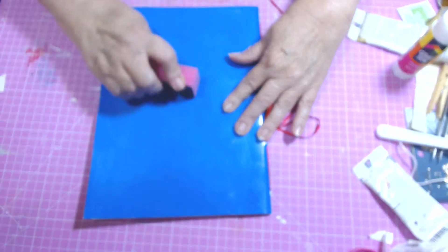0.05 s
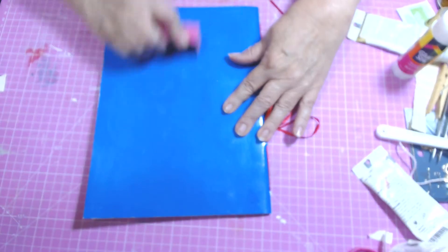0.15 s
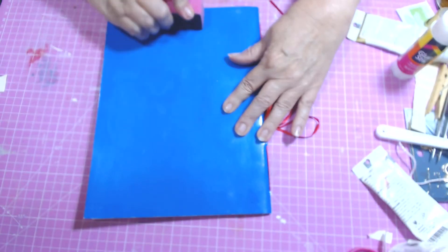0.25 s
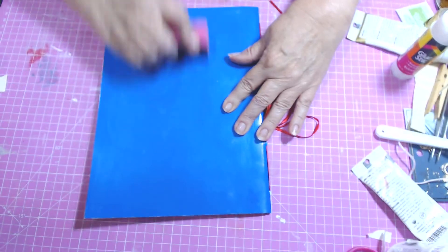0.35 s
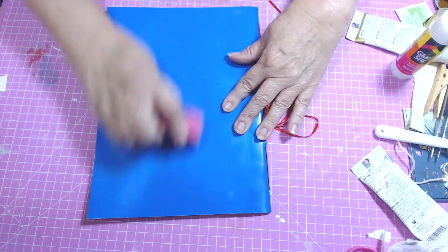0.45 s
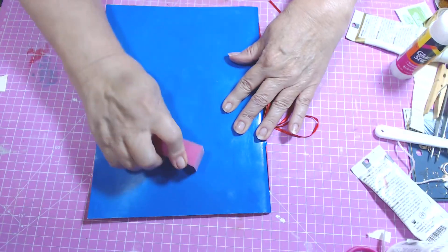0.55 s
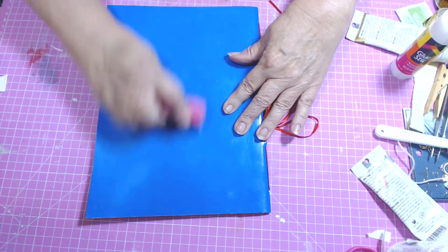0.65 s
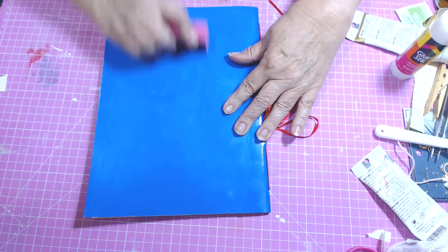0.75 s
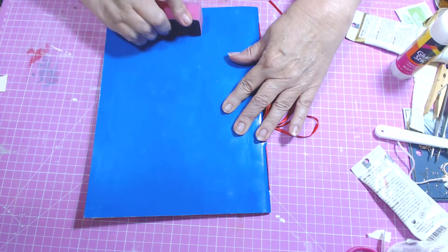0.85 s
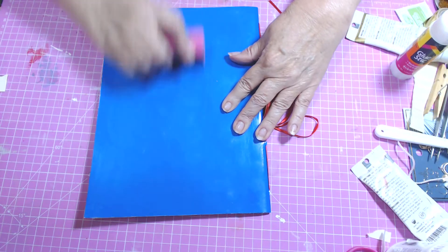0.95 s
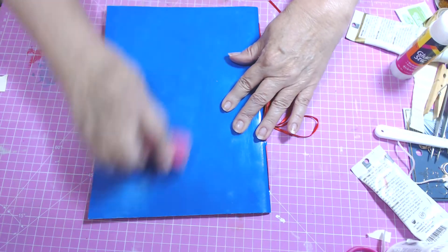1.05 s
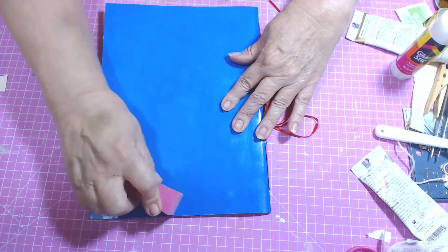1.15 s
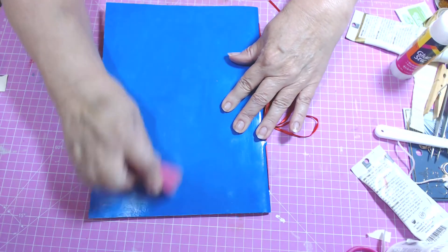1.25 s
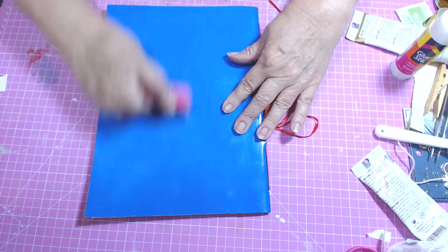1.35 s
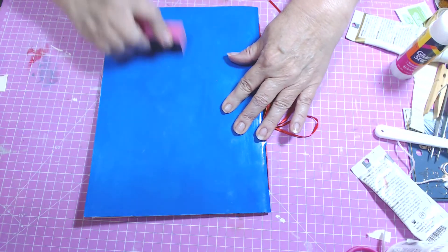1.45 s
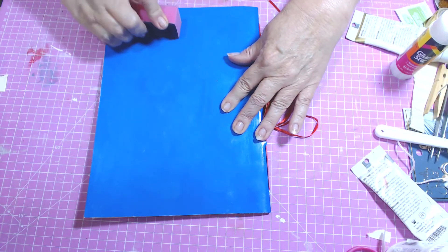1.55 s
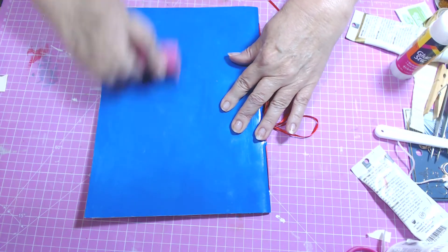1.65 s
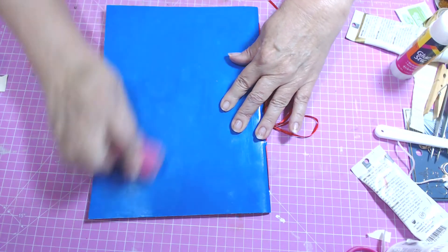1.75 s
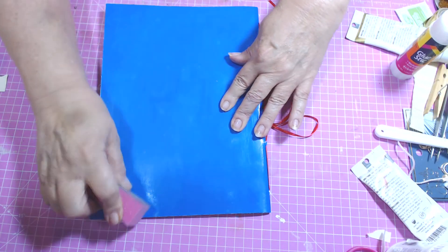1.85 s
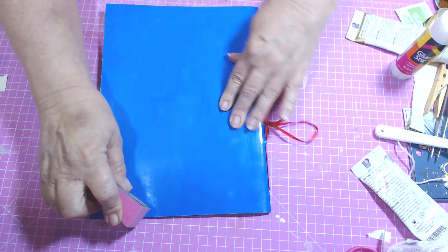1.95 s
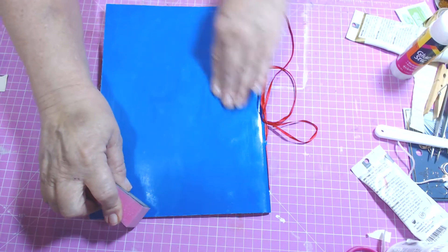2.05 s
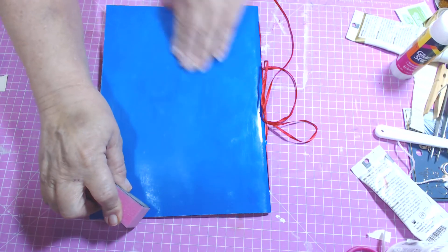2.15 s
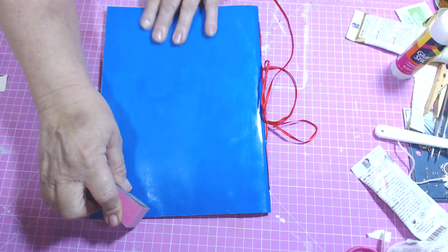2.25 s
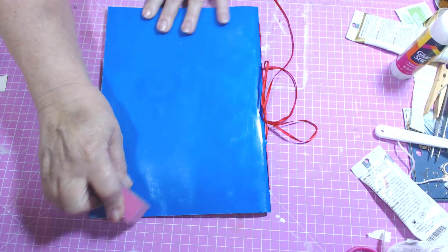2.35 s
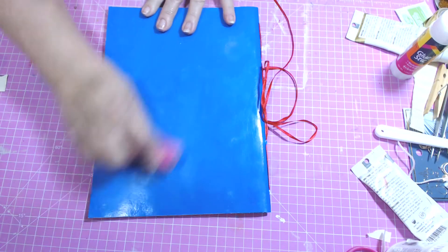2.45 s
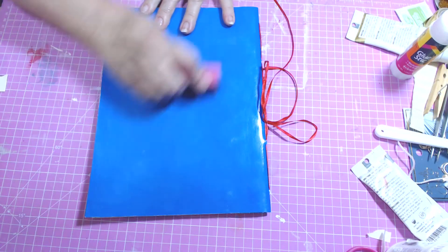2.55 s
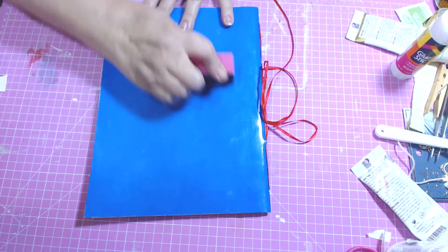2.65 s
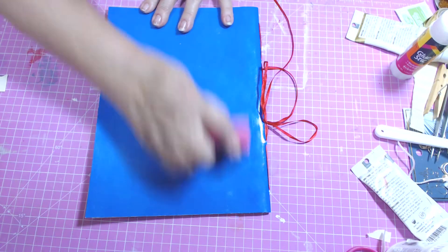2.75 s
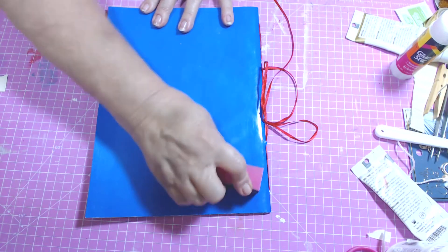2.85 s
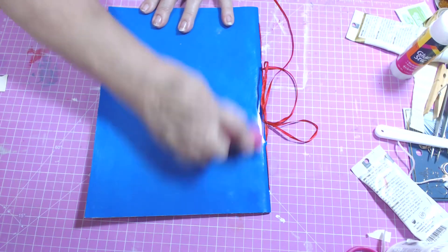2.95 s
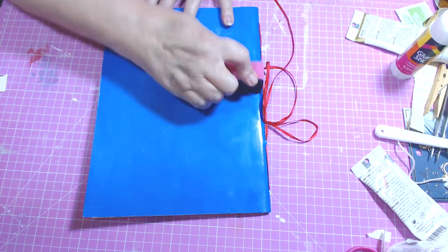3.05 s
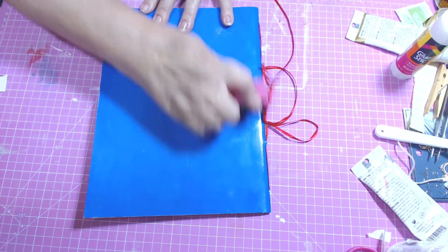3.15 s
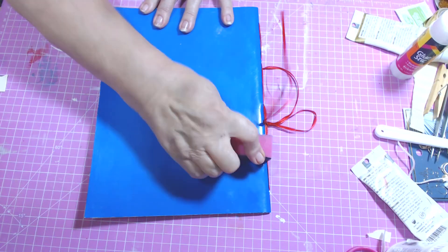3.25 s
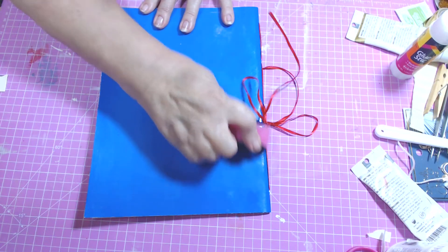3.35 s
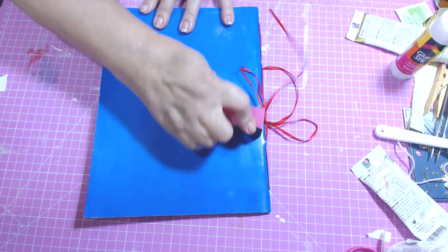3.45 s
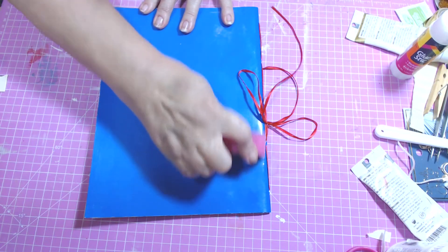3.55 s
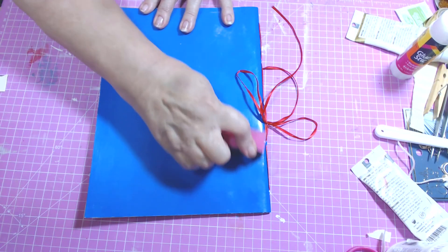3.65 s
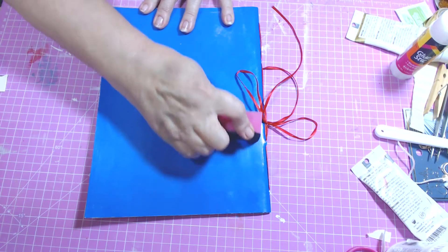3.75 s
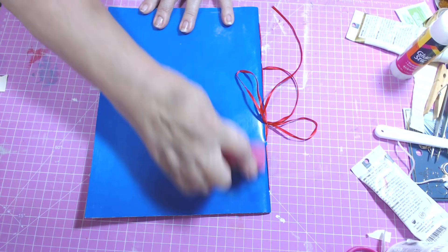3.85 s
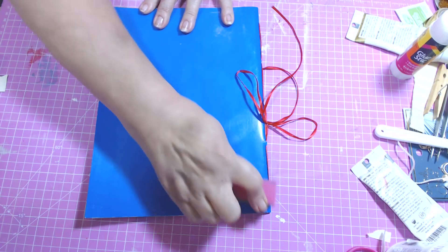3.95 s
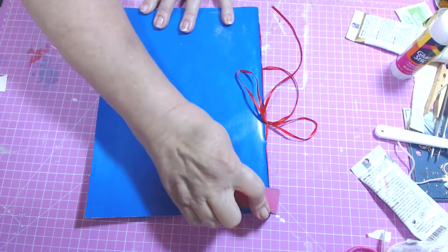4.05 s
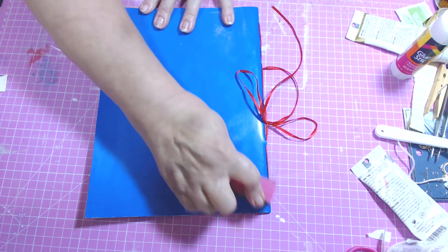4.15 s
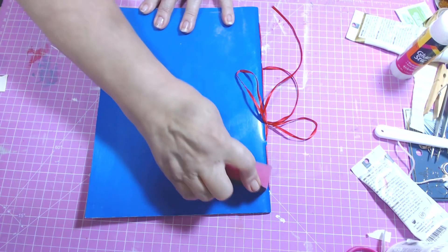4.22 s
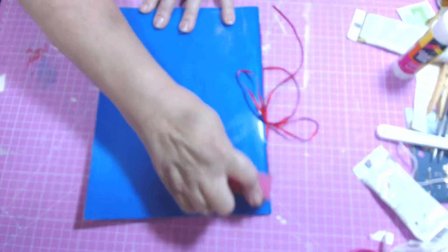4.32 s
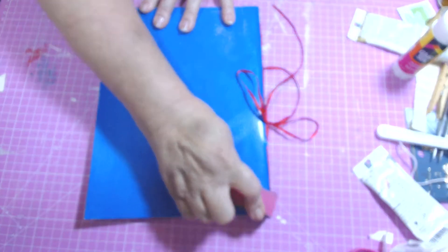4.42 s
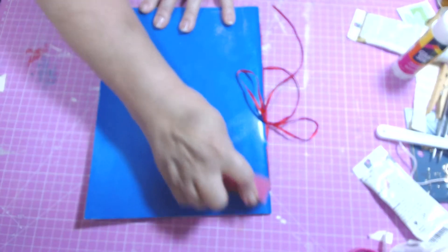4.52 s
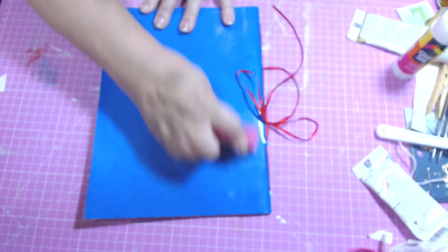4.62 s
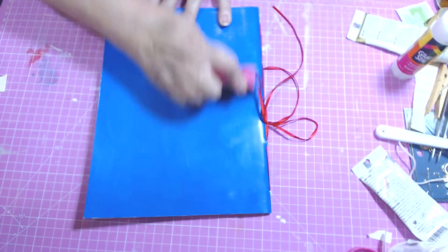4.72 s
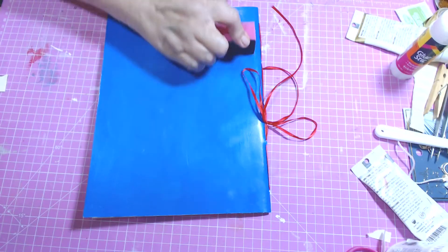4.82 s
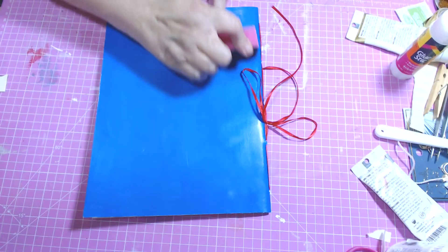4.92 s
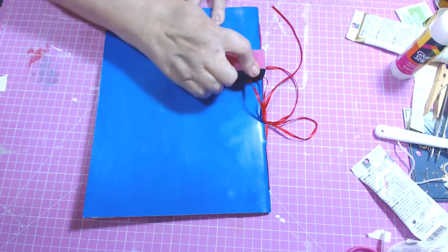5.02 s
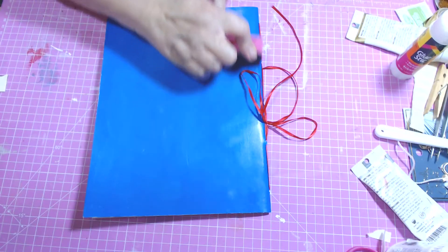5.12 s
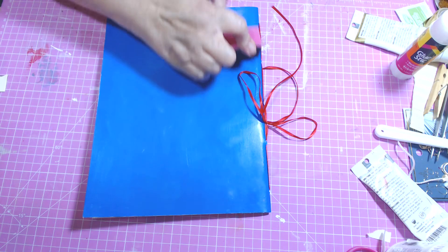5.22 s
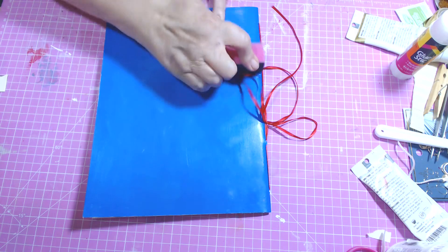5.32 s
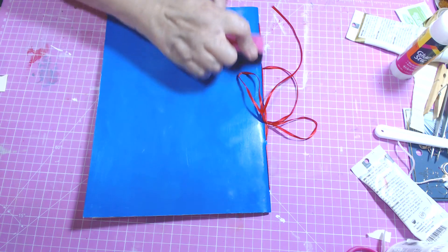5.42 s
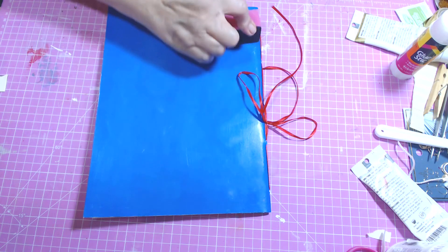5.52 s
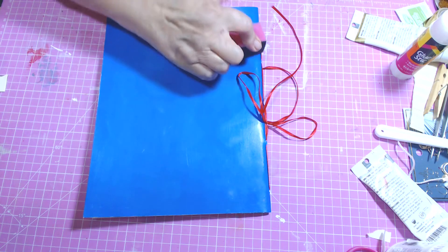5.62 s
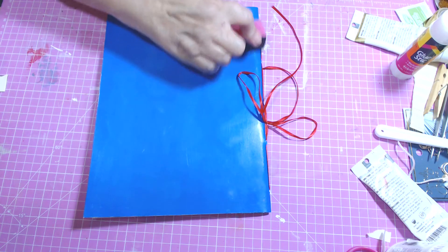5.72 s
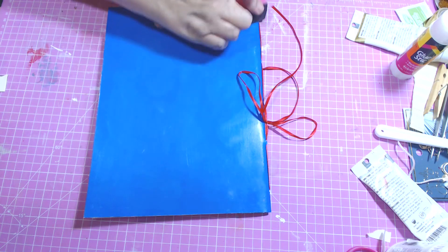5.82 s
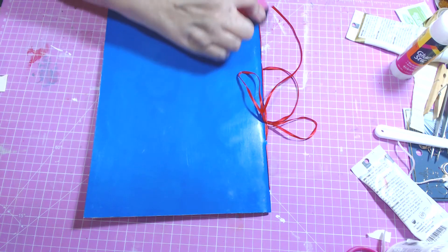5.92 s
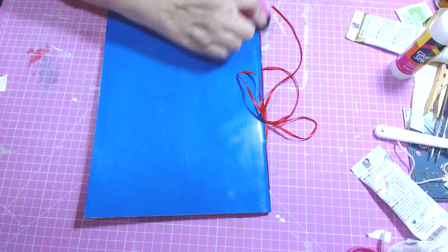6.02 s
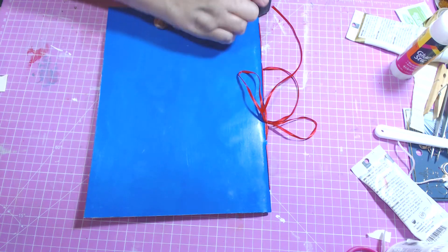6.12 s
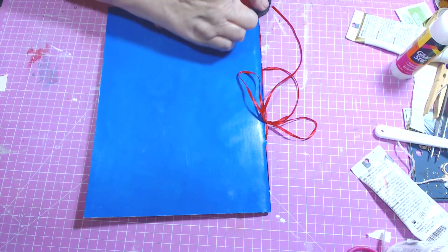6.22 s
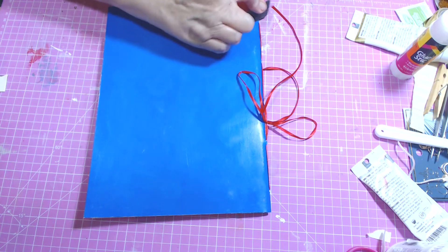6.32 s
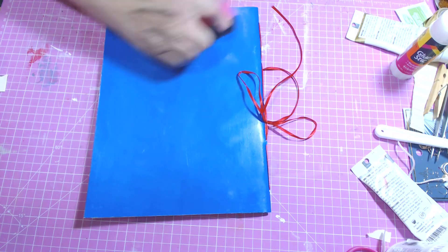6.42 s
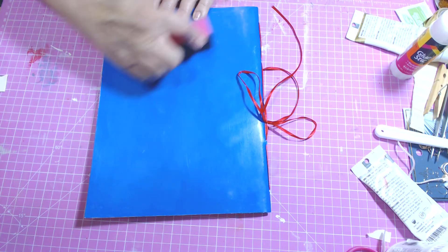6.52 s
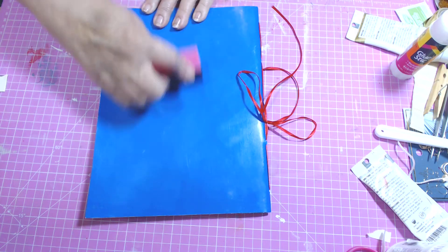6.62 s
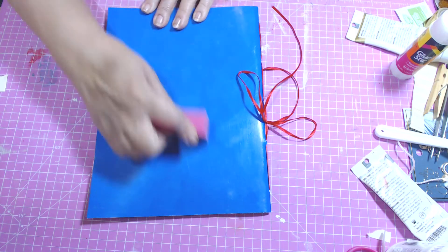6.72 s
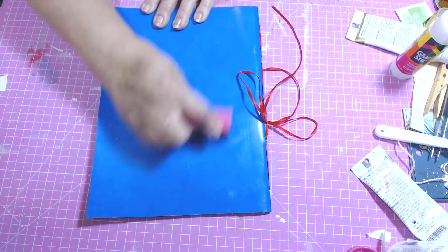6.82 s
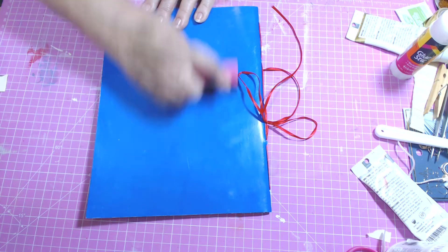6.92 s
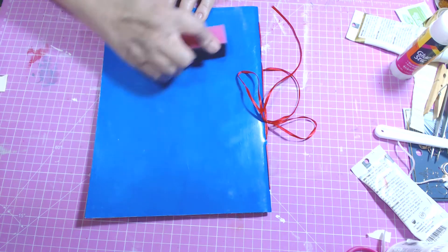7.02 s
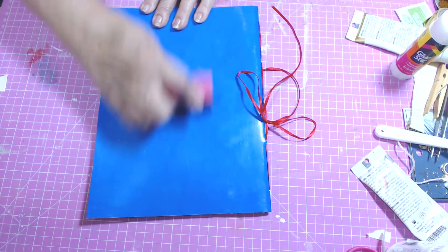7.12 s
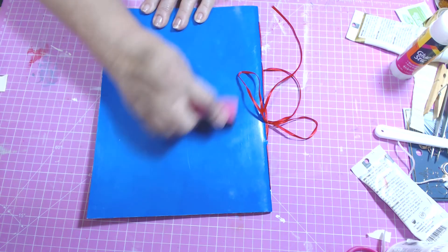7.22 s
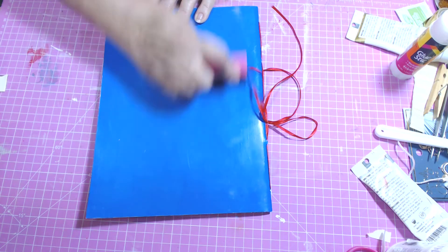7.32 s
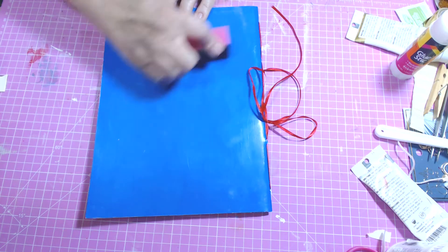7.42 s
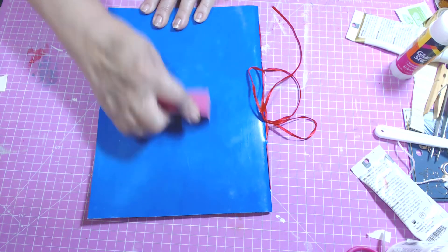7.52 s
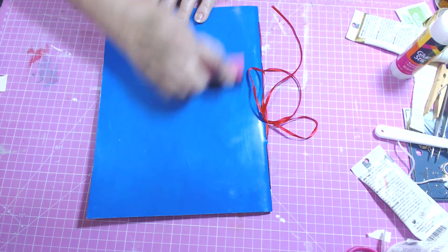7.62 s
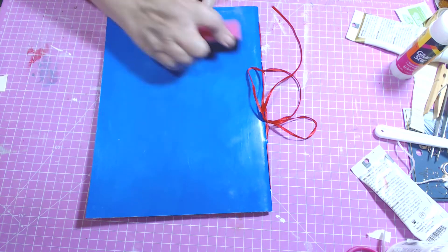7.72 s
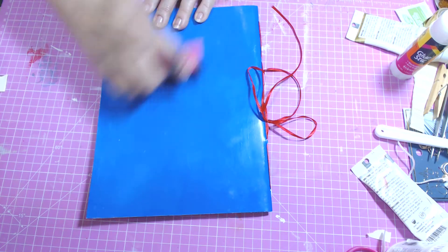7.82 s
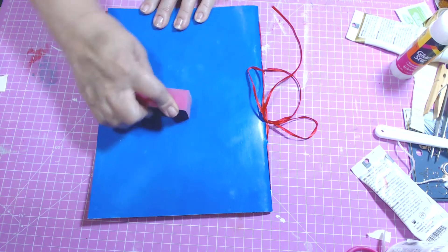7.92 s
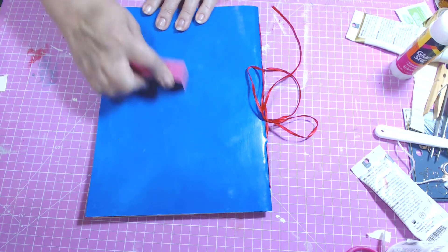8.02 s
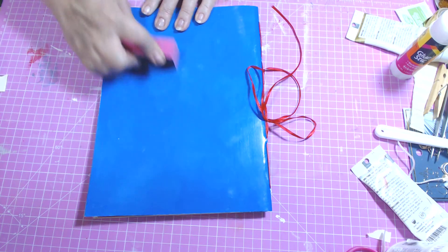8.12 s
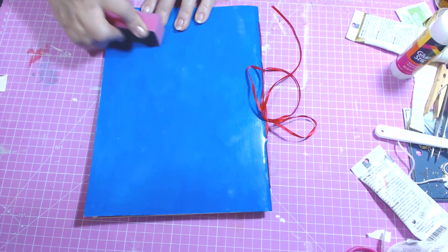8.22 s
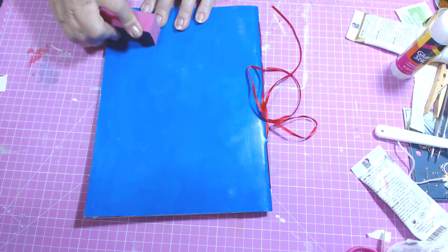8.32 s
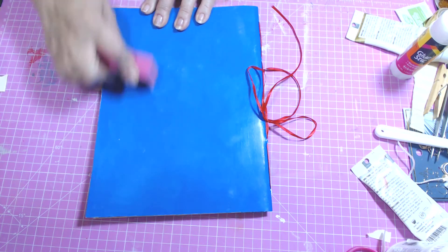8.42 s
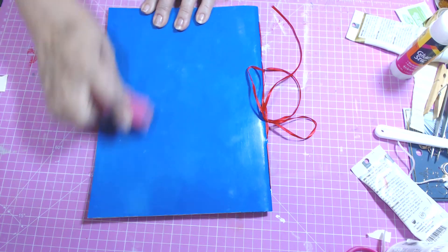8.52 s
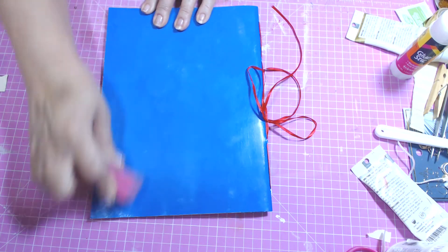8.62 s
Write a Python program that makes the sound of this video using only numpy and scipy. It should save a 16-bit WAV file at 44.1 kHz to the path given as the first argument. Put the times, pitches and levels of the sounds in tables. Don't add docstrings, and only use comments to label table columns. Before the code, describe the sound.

Close, dry, gritty scraping on thin plastic in quick to-and-fro strokes, with hollow drumming, soft table thumps and a brief pause of small ticks.

```python
import sys
import numpy as np
from scipy import signal
from scipy.fft import rfft, irfft, next_fast_len
from scipy.io import wavfile
from scipy.ndimage import uniform_filter1d, map_coordinates

SR = 44100
rng = np.random.default_rng(int(sys.argv[2]) if len(sys.argv) > 2 else 0)


def ratio(d):
    e = np.asarray(d, float) / 20
    return 10 ** e


def transcribe(u):
    v = np.clip(np.atleast_2d(u).T, -1, 1)
    q = np.round(v * 32767).astype(np.int16)
    wavfile.write(sys.argv[1], SR, q)


N = 382347
TIME = np.arange(N) / SR


def unit(x):
    return x / np.sqrt(np.mean(x ** 2) + 1e-20)


def along(points, hz):
    f, value = np.transpose(points)
    return np.interp(np.log(hz + 1), np.log(f + 1), value)


def curves(rows):
    s, *columns = np.transpose(rows)
    return [np.interp(TIME, s, column) for column in columns]


def wobble(rate):
    knots = rng.standard_normal(int(N * rate / SR) + 4)
    return map_coordinates(knots, [TIME * rate])


def filtered(x, response):
    m = next_fast_len(N + SR // 2)
    return irfft(rfft(x, m) * response(np.fft.rfftfreq(m, 1 / SR)), m)[..., :N]


def modes(resonances):
    def response(f):
        total = 0
        for k, (centre, width, db) in enumerate(resonances):
            damping = 1j * f * width
            total = total + (-1) ** k * ratio(db) * damping / (centre * centre - f * f + damping)
        return total
    return response


def colour(spectrum):
    return lambda f: ratio(along(spectrum, f))


def scratches(spread_db, patchy_db):
    hits = rng.standard_normal(N) * ratio(spread_db * wobble(900))
    z = signal.stft(hits, nperseg=256)[2]
    field = uniform_filter1d(rng.standard_normal(z.shape), 2, 0)
    field = uniform_filter1d(field, 24, 1)
    return signal.istft(z * ratio(patchy_db * unit(field)), nperseg=256)[1][:N]


def scraped(resonances, spread_db=1.5, patchy_db=1.0):
    return unit(filtered(scratches(spread_db, patchy_db), lambda f: modes(resonances)(f) ** 2))


# (f/Hz, level/dB per Hz)
QUIET = [(120, -32), (200, -10.5), (237, -8), (313, -30.5), (657, -17.5), (2260, -26.5), (2940, -25),
         (5800, -31.5), (7200, -35), (8020, -33), (10400, -66.5), (17600, -120)]


def quiet_air():
    return ratio(-69.5) * unit(filtered(rng.standard_normal(N), colour(QUIET)))


# (f/Hz, t60/s)
ROOM_DECAY = [(200, 0.72), (2000, 0.19), (8000, 0.15)]


def room(x):
    hz, t, z = signal.stft(rng.standard_normal(SR // 3), SR, nperseg=256)
    fade = ratio(-60 * t / along(ROOM_DECAY, hz)[:, None])
    tail = signal.istft(z * fade, SR, nperseg=256)[1]
    late = np.pad(x, (200, 0))
    return signal.fftconvolve(late, tail / np.linalg.norm(tail))[:N]


# (t/s, level/dB)
LEAN = [(0, -1), (.6, 2), (1.6, -2.5), (2.6, -2), (3.3, 2.5), (3.7, 0.5), (4.9, 1.5), (5.6, -0.5),
        (6.6, -2), (7.2, 3), (7.7, -1), (8.15, -3.5), (8.67, 0)]


def shake():
    bite, _, _, weight, *_ = grip()
    effort = 0.24 * bite + 0.4 * weight - 3.5 * (1 - speed())
    lag_s = 0.1
    return -57 + curves(LEAN)[0] + uniform_filter1d(effort, int(lag_s * SR))


# (f/Hz, width/Hz, level/dB)
TABLE_MODES = [(38, 27.5, -8), (71, 42.6, -5), (108, 32.2, 0), (126.5, 28.2, 0.5), (169.8, 34, -10),
               (200, 47, -12.5)]


def tremble():
    level_db = shake() + 1.5 * wobble(2.7) + 2.4 * wobble(20)
    return ratio(level_db) * unit(filtered(rng.standard_normal(N), modes(TABLE_MODES)))


# (t/s, peak level/dB, f/Hz, t60/s)
THUMPS = [(1.006, -51, 120, 0.16), (1.73, -51, 127, 0.11), (1.888, -49, 119, 0.077),
          (2.276, -39, 124, 0.058), (2.634, -55, 139, 0.25), (2.816, -34.5, 115, 0.06),
          (2.844, -44, 74.4, 0.16), (2.898, -46, 111, 0.11), (3.028, -41, 100.4, 0.11),
          (3.094, -35, 88, 0.1), (3.584, -43, 121, .08), (6.944, -46, 145, 0.12), (7.559, -45, 99, 0.12),
          (7.893, -35, 119, 0.074), (7.916, -48, 133, 0.26)]


def thumps():
    rattle = unit(filtered(rng.standard_normal(N), lambda f: modes([(220, 260, 0)])(f) ** 2))
    boom, t = np.zeros(N + SR), np.arange(SR // 4) / SR
    for s, db, hz, t60 in THUMPS:
        start = round(s * SR)
        ring = np.sin(2 * np.pi * hz * t) + 0.28 * np.sin(2 * np.pi * 1.4 * hz * t)
        rattling = 0.11 * ratio(35 * t / t60) * rattle[start:][:len(t)]
        onset = 1 - np.exp(-t / 0.0038)
        boom[start:][:len(t)] += ratio(db + 5.5 - 60 * t / t60) * onset * (ring + rattling)
    return boom[:N]


# (t/s, hiss level/dB, body level/dB above the hiss)
SLIDE = [
    (1.86, -84, -3),
    (2.002, -63, -1.5),
    (2.012, -66, -3),
    (2.032, -62.5, -2),
    (2.06, -65, -8),
    (2.124, -69.5, -2),
    (2.2, -80, -11),
]
# (f/Hz, level/dB per Hz)
SKIN = [(1060, -42), (1800, -7.5), (4150, -7.5), (5370, -8.5), (5930, -7.5), (7470, -8.5), (8000, -32),
        (10400, -59), (17600, -120)]


def slide():
    hiss_db, body_db = curves(SLIDE)
    touching = 1. * (TIME > SLIDE[0][0]) * (TIME < SLIDE[-1][0])
    touching = uniform_filter1d(touching, size=900)
    hiss = unit(filtered(scratches(3, 2), colour(SKIN)))
    body = unit(filtered(scratches(2, 2), modes([(610, 450, -2), (1100, 350, 0)])))
    return touching * ratio(hiss_db + 2.0) * (hiss + ratio(body_db + 0.5) * body)


# (t/s, peak level/dB, treble level/dB)
TICKS = [
    (1.848, -63, -15),
    (1.886, -41.5, -11.5),
    (1.89, -43, -20),
    (1.938, -37.5, -4.5),
    (1.99, -41.5, -22.5),
    (2.023, -42.5, -23),
    (2.03, -39, -16),
    (2.041, -42, -20),
    (2.06, -51, -10),
]


def ticks():
    knock, snap = np.zeros((2, N))
    for s, db, treble_db in TICKS:
        knock[round(s * SR)] = ratio(db + 17.5)
        snap[round(s * SR)] = ratio(db + treble_db + 17)
    low = filtered(knock, modes([(1160, 640, 5.5), (2910, 1200, -18)]))
    return low + filtered(snap, modes([(6100, 3000, 0)]))


# (t/s, length/s, level/dB)
SQUEAK = [
    (2.106, 0.018, -58),
]


def squeak():
    out = np.zeros(N)
    tone = np.sin(2 * np.pi * 1250 * TIME) + np.sin(2 * np.pi * 2880 * TIME) / 4
    for s, length, db in SQUEAK:
        skid = np.sin(np.pi * np.clip((TIME - s) / length, 0, 1)) * ratio(3 * wobble(300))
        out += ratio(db) * skid * tone
    return out


# (t/s, nearness to the lower spine 0-1, nearness to the far corner 0-1)
PLACE = [
    (2.2, 0.08, 0),
    (3.0, 0.4, 0.2),
    (3.3, 0.79, 0.13),
    (4.3, 0.88, .03),
    (4.7, 0.11, 0.3),
    (5.4, 0.05, 0.48),
    (6.1, 0.43, 0.56),
    (6.5, 0.12, 0.16),
]


def place():
    return np.clip(curves(PLACE), 0, 1)


# (start t/s, end t/s, speed-up/s, slow-down/s)
STROKES = [(0, 0.128, 0.02, 0.0069), (0.173, 0.446, 0.009, 0.028), (0.479, 0.731, 0.033, 0.018),
           (0.77, 1.068, 0.027, 0.025), (1.124, 1.427, 0.017, 0.013), (1.459, 1.783, 0.036, 0.057),
           (2.262, 2.528, 0.037, 0.035), (2.502, 2.766, 0.049, 0.013), (2.801, 2.971, 0.018, 0.012),
           (2.988, 3.176, 0.02, 0.025), (3.206, 3.35, 0.041, 0.022), (3.36, 3.498, 0.015, 0.035),
           (3.525, 3.648, 0.037, 0.023), (3.668, 3.926, 0.061, 0.039), (3.999, 4.15, 0.031, 0.025),
           (4.174, 4.313, 0.02, 0.032), (4.373, 4.738, 0.018, 0.013), (4.771, 4.921, 0.027, 0.017),
           (4.952, 5.083, 0.034, 0.025), (5.102, 5.237, 0.028, 0.015), (5.255, 5.419, 0.087, 0.013),
           (5.43, 5.565, 0.051, 0.026), (5.607, 5.727, 0.048, 0.015), (5.764, 5.884, 0.087, 0.013),
           (5.924, 6.026, 0.045, 0.0037), (6.055, 6.17, 0.043, 0.033), (6.2, 7.835, 0.058, 0.055),
           (7.822, 8.163, 0.11, 0.068), (8.196, 8.616, 0.14, 0.026)]


def speed():
    start, end, up, down = np.transpose(STROKES)
    k = np.searchsorted((end[:-1] + start[1:]) / 2, TIME)
    loose = np.sin(np.pi / 2 * np.clip((TIME - start[k]) / up[k], 0, 1))
    braking = np.sin(np.pi / 2 * np.clip((end[k] - TIME) / down[k] / 2 + .5, 0, 1)) ** 2
    return np.where(TIME < end[0] / 2, 1, loose * braking)


# (bite early level/dB, bite late level/dB, drumming early level/dB, drumming late level/dB)
PASSES = [(-48.0, -51.5, -54, -52), (-48.0, -48, -48, -53), (-46.5, -48, -53, -52),
          (-48, -49.5, -51.0, -53), (-47.5, -48.5, -55.5, -54), (-49.5, -50.0, -50.5, -55),
          (-53, -50, -57.5, -60.5), (-46.5, -45.0, -47.5, -53), (-47, -52, -54.5, -55),
          (-51, -49.5, -49.0, -49), (-51.5, -53, -55, -55.5), (-56.0, -52.0, -57, -52),
          (-47.5, -45.5, -55.5, -54), (-51.5, -55, -53, -51.5), (-54.5, -50.0, -53, -50.5),
          (-56, -52.5, -54.5, -48.5), (-47.5, -49, -53.5, -54.5), (-51, -49.5, -50.5, -49),
          (-55.5, -50.5, -53.5, -46.5), (-57, -52.5, -55, -48.5), (-55.5, -54, -55.5, -47),
          (-59.5, -53, -59, -49), (-54, -54.5, -54, -54.0), (-50.5, -54, -55, -51),
          (-55.0, -49.5, -51.5, -51.5), (-65, -61.5, -57, -55), (-48, -46.5, -55, -50.5),
          (-50, -52.5, -51, -57.5)]
# (cover flex early level/dB, late level/dB, weight on the pages level/dB, pace level/dB)
FEEL = [(1, 0.5, 3.5, 3.5), (4, -0.5, 0.0, 0.5), (0, 0.5, 2.0, 2), (3.5, 1, 2.0, 1), (0, 2, 4, 0.5),
        (1, -1.5, 1.5, 0.5), (1.5, 0.5, 1.5, 1.5), (0.5, -1, 0, -3.5), (0.5, -2, -1, 1.5), (2, 0, 5.5, 2),
        (0, -4, 2, 0.5), (2.5, -2.5, 1, 1), (-2, -2.0, 2.5, -2), (-2.5, 6, 0, 2), (-0.5, 1.0, -3, -2.5),
        (-1, 1, -2, 0.5), (0, -1, -1.5, -1.0), (2.5, 1.5, -2, -3), (0.5, -6.5, 2.5, -1),
        (3.5, -1.5, 2, -1.0), (-0.5, -1.0, 3, 1), (2, 1, 1, -3), (-2, 1.5, 1.5, 1), (2, 0.0, 3.5, -1),
        (1, 2, -2.5, 1.5), (3.5, 4.5, 0.5, -11), (1.5, -1.5, -2.5, -1.5), (0.5, 0.5, 2, -3)]
# (t/s, bite level/dB, drumming level/dB, flex level/dB)
LOOPS = [(6.26, -51.5, -56.5, 1.5), (6.45, -54, -54.5, 1.5), (6.6, -48.5, -52, 1), (6.73, -49, -57, -2.5),
         (6.86, -46, -51.5, 0.5), (6.98, -50.5, -47.5, 1), (7.1, -46.5, -55, -0.5), (7.2, -47, -56.5, 2.5),
         (7.34, -49, -49.5, -2), (7.51, -48, -56.5, 1), (7.62, -45.5, -51, 1.5), (7.7, -50, -52.5, -0.5),
         (7.79, -50, -49.5, 0)]
MEAN_BITE_DB, MEAN_DRUM_DB = -50, -53


def grip():
    straight = [s[:2] for s in STROKES if s[1] - s[0] < 1]
    start, end = np.transpose(straight)
    length = end - start
    p, f = np.transpose(PASSES), np.transpose(FEEL)
    rows = [*zip(start + 0.25 * length, p[0], p[2], f[0], f[2], f[3])]
    rows += [*zip(start + 0.68 * length, p[1], p[3], f[1], f[2], f[3])]
    rows += [(*loop, 0, 0) for loop in LOOPS]
    bite, drum, flex, weight, pace = curves(sorted(rows))
    k = np.clip(np.searchsorted(start, TIME) - 1, 0, None)
    arch = np.sin(np.pi * np.clip((TIME - start[k]) / length[k], 0, 1)) ** 2
    sweep = 9 * length[k] * arch
    pace = pace - 7 * np.exp(-np.abs(TIME - start[k]) / 0.04) * (k > 0)
    return bite - MEAN_BITE_DB, drum - MEAN_DRUM_DB, flex, weight, pace, sweep


def levels():
    bite, drum, flex, weight, pace, sweep = grip()
    spine, corner = place()
    pages = -60 + weight - 0.1 * bite + 0.74 * drum + 1.5 * spine + 4 * corner
    bright = MEAN_BITE_DB + bite - 0.15 * sweep
    hollow = -54 + 1.12 * drum
    middle = -51.5 + flex + 0.63 * bite + 0.45 * drum + 0.5 * spine - 3 * corner
    grit = -52.5 + 0.76 * bite + pace + sweep - 1.5 * spine - 1.5 * corner
    return pages, bright, hollow - bright, middle - bright, grit - bright


# (f/Hz, width/Hz, level/dB)
BOOK = [(293, 110, -8.5), (439, 121, -0.5), (596.5, 217, 0.5), (857, 190, -2.5)]


def book_pages(corner):
    uneven = dict(spread_db=0.5, patchy_db=2.97)
    low = 0.54 * (1 - 0.78 * corner) * scraped(BOOK[:2], **uneven)
    return low + 0.79 * scraped(BOOK[2:], **uneven)


# (f/Hz, width/Hz, level/dB)
HOLLOW = [(990, 213, -3.5), (1233, 143, 1), (1563, 240, -3)]
# (f/Hz, width/Hz, level/dB)
HINGE = [(925, 150, -1.5), (1327, 200, -2.5), (1580, 280, -1.5)]
# (f/Hz, width/Hz, level/dB)
CORNER = [(1107, 130, 0.5), (1293, 140, 2.5), (1500, 270, -2)]


def air_gap(spine, corner):
    middle = np.sqrt(np.clip(1 - spine - corner, 0, 1)) * scraped(HOLLOW)
    return middle + np.sqrt(spine) * scraped(HINGE) + np.sqrt(corner) * scraped(CORNER)


# (f/Hz, width/Hz, level/dB)
MIDDLE = [(1954, 373, 2), (2169, 60, -11), (2357, 556, 3)]


def flexing_cover():
    return scraped(MIDDLE)


# (f/Hz, width/Hz, level/dB)
BRIGHT = [(2720, 403, -4), (2993, 356, 0), (3358, 260, -1), (3652, 287, -2), (4425, 1000, -7)]
# (f/Hz, width/Hz, level/dB)
TIP = [(2820, 600, -1), (3370, 620, -5), (4330, 1100, -7.5)]


def bright_cover(corner):
    return np.sqrt(1 - corner) * scraped(BRIGHT) + np.sqrt(corner) * scraped(TIP)


# (f/Hz, level/dB per Hz)
GRIT = [(2350, -40), (4000, -5.5), (4450, -3.5), (7220, -7.5), (7610, -10), (8020, -17), (10400, -55.5),
        (17600, -120)]


def cutting_grit():
    return unit(filtered(scratches(spread_db=-1.1, patchy_db=0.4), colour(GRIT)))


def block():
    pages_db, bright_db, hollow_db, middle_db, grit_db = levels()
    v = speed()
    spine, corner = place()
    grip_db = 0.5 * wobble(14) + 0.86 * wobble(45)
    pages = ratio(pages_db) * v ** 0.66 * book_pages(corner)
    cover = ratio(hollow_db) * v ** 0.56 * air_gap(spine, corner)
    cover += ratio(middle_db) * v ** 0.75 * flexing_cover()
    cover += v * bright_cover(corner)
    cover += ratio(grit_db) * v ** 2.2 * cutting_grit()
    return ratio(grip_db) * (pages + ratio(bright_db) * cover)


def scene():
    near = slide() + ticks() + squeak() + block()
    mono = quiet_air() + ratio(-15.0) * room(near) + tremble() + thumps() + near
    return np.tile(mono, (2, 1))


# (f/Hz, level/dB)
MICROPHONE = [(20, 3), (40, 0), (7400, 0.5), (7900, -8.5), (8250, -19.5), (8400, -70)]


def microphone(dry):
    return filtered(dry, colour(MICROPHONE)) + ratio(-96.5) * rng.standard_normal(N)


def top_cut(x):
    return signal.sosfilt(signal.butter(12, 8170, fs=SR, output="sos"), x)


def record(dry):
    heard = microphone(dry)
    return top_cut(heard)


dry = scene()
out = record(dry)
transcribe(out)
```